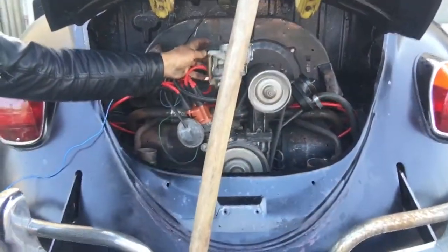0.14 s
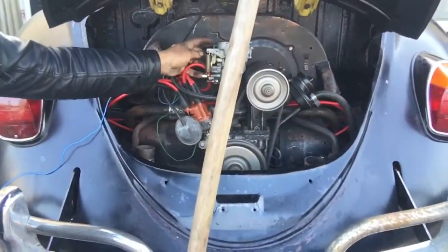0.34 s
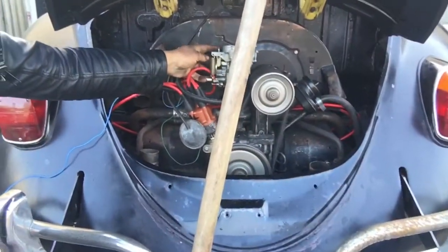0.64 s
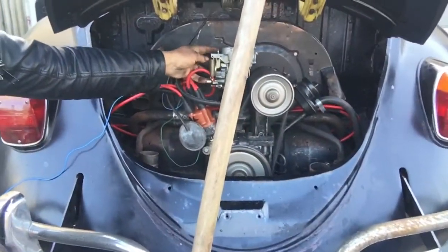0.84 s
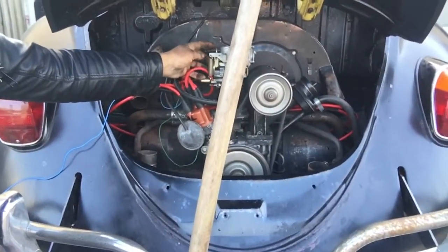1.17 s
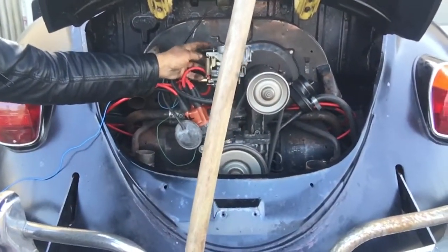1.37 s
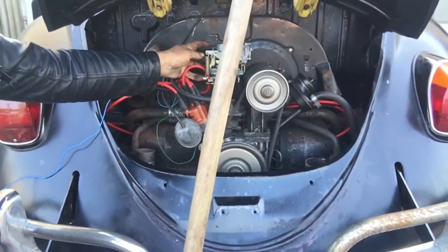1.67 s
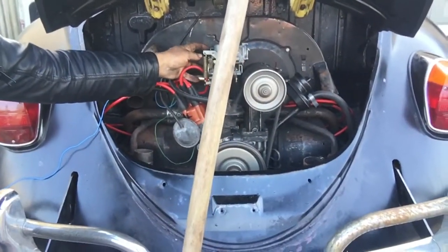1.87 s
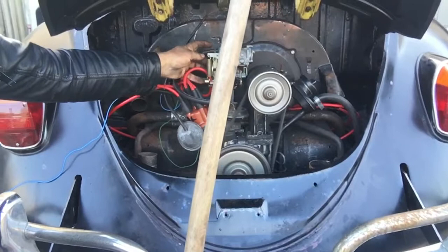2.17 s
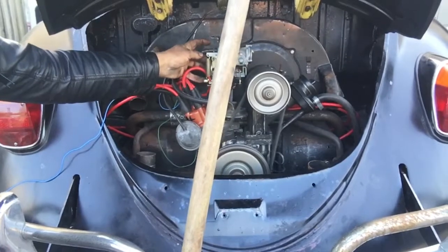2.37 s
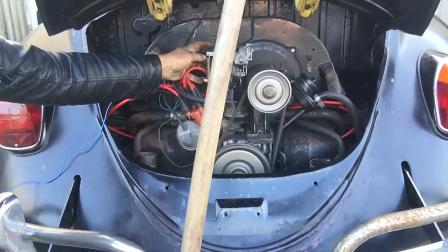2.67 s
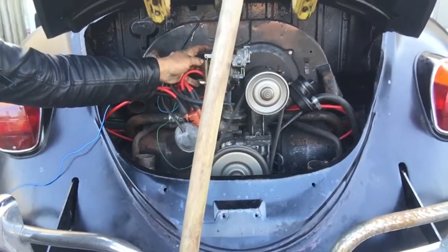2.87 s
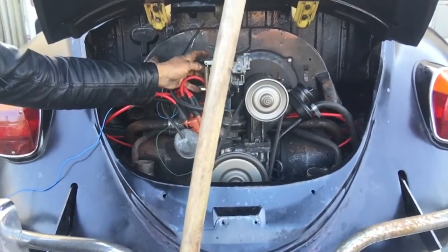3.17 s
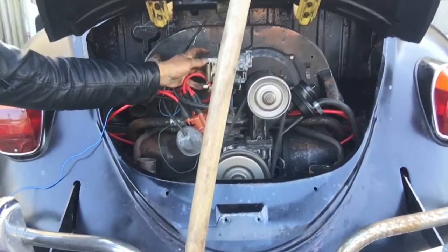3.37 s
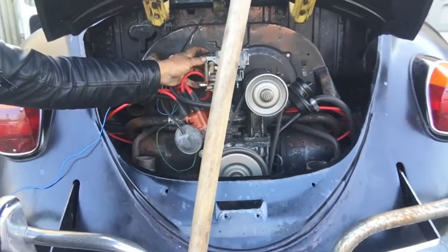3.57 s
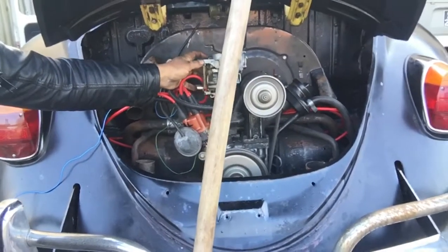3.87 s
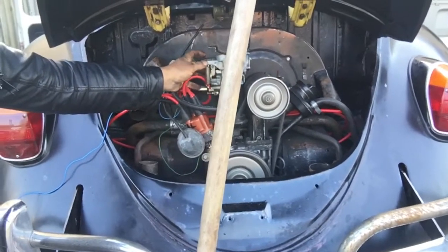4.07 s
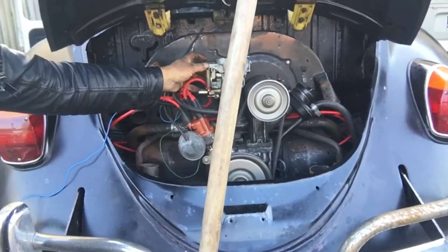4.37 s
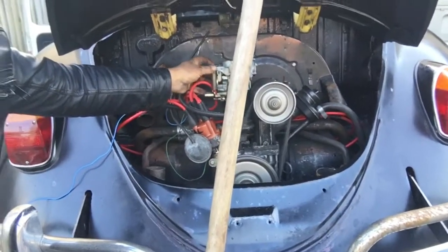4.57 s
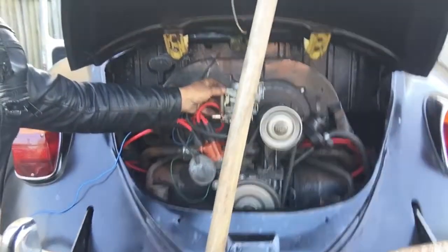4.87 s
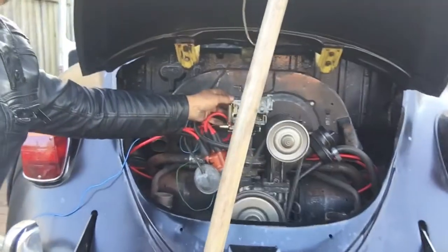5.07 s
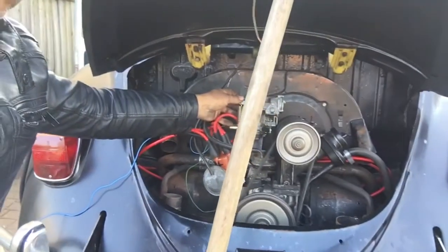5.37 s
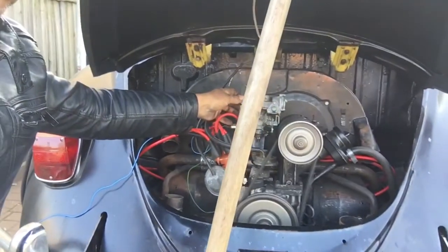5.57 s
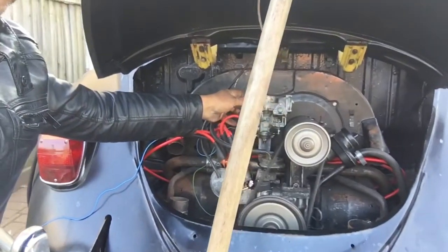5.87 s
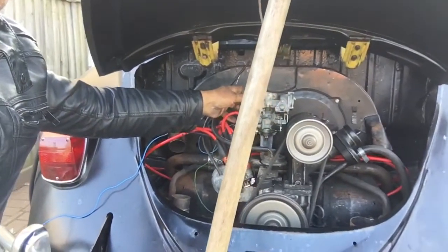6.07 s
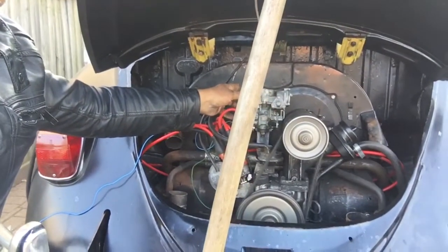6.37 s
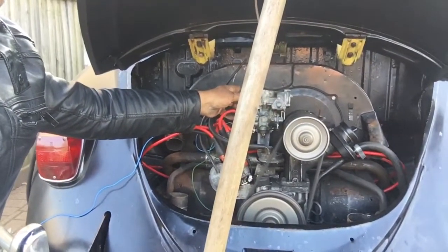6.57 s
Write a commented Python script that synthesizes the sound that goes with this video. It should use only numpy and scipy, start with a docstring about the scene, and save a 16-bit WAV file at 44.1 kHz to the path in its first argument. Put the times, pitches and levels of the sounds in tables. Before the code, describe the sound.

Close at an open engine bay outdoors, an old air-cooled four-cylinder engine is blipped by hand. A round exhaust boom rises and falls over metallic valve clatter, shaking tin and fan whine. Each opening brings raspy intake breath and bright, very short belt chirps. The longest rev stumbles with a sharp carburettor spit near three seconds; slower, lumpy running fills the gaps. Sound is dry, with tiny bay echoes.

```python
"""At an open engine bay, lid raised: an air-cooled flat-four is blipped six times by hand, pulling and coasting,
and sinks to a lumpy idle between blips. Sines locked to the firings make the exhaust boom and growl; filtered
impacts and noise make the valve-gear clatter, shaking tin and intake rasp; the fan whines as a wavering sine.
Fan-belt chirps are gliding sines, carburettor spits are noise cracks. No distance loss is applied: the bay's
short echoes sit 13 dB under the direct sound, and the microphone rounds the highest peaks."""
import sys
import numpy as np
from scipy import signal
from scipy.fft import rfft, irfft
from scipy.io import wavfile
from scipy.ndimage import uniform_filter1d

SR = 44100
rng = np.random.default_rng(int(sys.argv[2]) if len(sys.argv) > 2 else 0)


def generate_wav(sig):
    """Save sig (samples, or channels by samples) to the path in sys.argv[1] as 16-bit PCM at SR."""
    pcm = np.round(np.clip(np.atleast_2d(sig).T, -1, 1) * 32767).astype(np.int16)
    wavfile.write(sys.argv[1], SR, pcm)


N = 297234
TIME = np.arange(N) / SR

CHANGEOVER_S = 0.031  # the boom collapses about this long either side of a change of pulling or coasting
STUMBLE_S, STUMBLE_END_S = 2.87, 3.19  # the engine misfires at the top of the longest blip
STUMBLE_BOOM_DB, STUMBLE_RASP_DB = -6, -8.5

# In every spectrum below only the shape counts: colour() scales the filter to unit energy.

# turning points of the engine speed: time_s [s], firing_rate_hz [firings per second]
SPEED_POINTS = [(0, 65), (.17, 79.6), (.6, 59.7), (1.4, 33.01), (1.7, 30.91), (1.87, 45.54), (2.19, 76.9),
                (2.53, 57.7), (2.86, 87.93), (3.03, 87.9), (3.19, 93), (3.66, 69.5), (3.92, 89.9),
                (4.5, 62.17), (4.97, 44.78), (5.65, 43.62), (6.04, 74.83), (6.5, 54.2), (6.74, 63.1)]


def crankshaft():
    """The speed moves between turning points on a log scale; its running sum counts the firings."""
    time_s, rate_hz = np.transpose(SPEED_POINTS)
    hz = np.exp(np.interp(TIME, time_s, np.log(rate_hz)))
    return hz, np.cumsum(hz) / SR


# blips of the throttle: open_s [s], pull_s (the engine starts to pull) [s], shut_s [s],
# ease_s (time taken to ease it back) [s], rasp_db (intake rasp at full opening) [dB]
THROTTLE_BLIPS = [(-.35, -.1, .2, .14, -20.5), (1.55, 1.8, 2.2, .17, -22.5), (2.35, 2.53, 3.2, .04, -23),
                  (3.52, 3.67, 3.95, .08, -23.5), (5.52, 5.7, 6.06, .12, -23),
                  (6.36, 6.53, 6.95, .15, -24.5)]
OPEN_S = .3  # the hand opens the throttle this slowly
COAST_S, RELIGHT_S = 0.82, 0.31  # after a blip the engine coasts, then the idle firings return


def throttle(shut_db):
    """The hand moves the throttle between 0 and 1, and the level of the intake rasp follows it."""
    opening, rasp_db = 0, shut_db
    for opens, _, shuts, ease_s, full_db in THROTTLE_BLIPS:
        blip = ramp(opens, OPEN_S) * (1 - ramp(shuts - ease_s, ease_s))
        opening = opening + blip
        rasp_db = rasp_db + blip * (full_db - shut_db)
    return opening, rasp_db


def duty():
    """Shares of pulling, coasting and idling, and the nearness 0-1 of a changeover between them."""
    pulling = coasting = changeover = np.zeros(N)
    for _, pulls, shuts, *_ in THROTTLE_BLIPS:
        shut = ramp(shuts, CHANGEOVER_S)
        pulling = np.maximum(pulling, ramp(pulls, CHANGEOVER_S) - shut)
        coasting = np.maximum(coasting, shut - ramp(shuts + COAST_S, RELIGHT_S))
        for s, width_s in (pulls, 1.58 * CHANGEOVER_S), (shuts, CHANGEOVER_S):
            changeover = np.maximum(changeover, np.exp(-((TIME - s) / width_s) ** 2))
    shares = np.array([pulling, (1 - pulling) * coasting, (1 - pulling) * (1 - coasting)])
    return shares, changeover


# boom of the silencer against engine speed: firing_rate_hz [firings per second], level_db [dB]
SILENCER_BOOM = [(31, -36), (44, -18.5), (52, -16), (62, -12.5), (73, -10.5), (82, -15), (92, -15)]
# added to the boom, level of its octave, level of the lumps: pulling_db, coasting_db, idling_db [dB]
BOOM_DUTY_DB = [1, -0.1, -3]
OCTAVE_DUTY_DB = [-22.5, -29.5, -23.5]
LUMP_DUTY_DB = [-20.5, -27.5, -20.5]
# strength of the four cylinders in firing order: level_db [dB]
CYLINDER_STRENGTH_DB = [3.54, 2.88, 3.35, 2.5]
# ring of the silencer: frequency_hz [Hz], level_db [dB]
PIPE_SPECTRUM = [(30, -32.5), (45, -4), (66, 3.5), (90, -5.5), (115, -6.5), (150, -19), (220, -22.5),
                 (400, -42)]
MUFFLE_HZ, MUFFLE_DB_PER_OCTAVE = 68, -6  # above this firing rate the silencer damps the boom's octave
MISFIRE_DB = -16  # lumpy beat during a changeover or a stumble


def exhaust(firings, hz, stumble):
    """A round boom at the firing rate; unequal cylinders add a lumpy beat that rings the silencer."""
    shares, changeover = duty()
    tone_db = np.interp(hz, *np.transpose(SILENCER_BOOM)) + 0.93 * walk(24)
    tone = undb(tone_db) * (undb(BOOM_DUTY_DB) @ shares)
    muffle_db = MUFFLE_DB_PER_OCTAVE * np.maximum(np.log2(hz / MUFFLE_HZ), 0)
    octave = undb(muffle_db) * (undb(OCTAVE_DUTY_DB) @ shares)
    turn = 2 * np.pi * (firings + .01 * walk(40))
    boom = np.sqrt(2) * (tone * np.sin(turn) + octave * np.sin(2 * turn + 1))
    boom_gain = (1 - changeover) * undb(STUMBLE_BOOM_DB * stumble)

    beats = strokes(firings, CYLINDER_STRENGTH_DB, scatter_db=.55)
    # only what departs from the mean stroke makes lumps
    excess = beats - (beats > 0) * beats[beats > 0].mean()
    misfire = np.maximum(changeover, stumble)
    lump_gain = np.maximum(undb(LUMP_DUTY_DB) @ shares, undb(MISFIRE_DB) * misfire)
    return boom_gain * boom + lump_gain * unit(colour(excess / np.sqrt(hz), PIPE_SPECTRUM))


# overtones of the exhaust: multiple [times the firing rate], level_db [dB]
EXHAUST_OVERTONES = [(2.5, -10), (3, -16), (3.5, -12), (4, -6.5), (5, -16), (6, -13.5), (7, -12.5)]
# level against the machinery; added by full throttle; added while it misfires
GROWL_DB, GROWL_LOAD_DB, GROWL_STUMBLE_DB = -5.5, 2, 1.5


def growl(firings):
    """The pipes' overtones, half orders included, glide with the engine and flutter."""
    out = np.zeros(N)
    for multiple, db in EXHAUST_OVERTONES:
        level = undb(db + 2.5 * walk(25))
        turns = multiple * firings + rng.random() + .035 * walk(30)
        out += level * np.sin(2 * np.pi * turns)
    return out


# ring of the crankcase: frequency_hz [Hz], level_db [dB]
CASE_SPECTRUM = [(400, -5), (780, -11), (930, -2.5), (1030, 8), (1180, 2), (1400, 0), (1630, 3.5),
                 (1930, -3.5), (2200, -2.5), (2850, 2), (3300, -11), (4800, -20), (6600, -17.5),
                 (9500, -23), (16000, -35)]
# rattle of the tappets: frequency_hz [Hz], level_db [dB]
TAPPET_SPECTRUM = [(1000, 1.5), (2700, 10), (3800, 5.5), (4700, -1), (6300, 2.5), (8000, 1), (11500, -5),
                   (16000, -9)]
# level at 60 firings a second with the throttle shut; added by speed; added by full throttle
MACHINE_DB, MACHINE_DB_PER_OCTAVE, MACHINE_LOAD_DB = -28, 3.5, 4.5


def machinery(firings, hz):
    """Pistons and gears ring the crankcase over rushing air; the tappets rattle unevenly above them."""
    slaps = knocks(firings, spread_db=1.5, scatter_db=2.5, count=16) / np.sqrt(hz)
    clatter = undb(-7) * unit(slaps) + undb(-4.5) * puffs(slaps, decay_s=.007)
    rush = undb(-5.5 + 1.5 * walk(25)) * rng.standard_normal(N)
    taps = knocks(firings, spread_db=1.5, scatter_db=2.5, count=5)
    tappets = colour(puffs(taps, decay_s=.011), TAPPET_SPECTRUM)
    # the taps stand out more as the engine slows towards idle
    tappet_gain = undb(-7.5) * 55 / np.maximum(hz, 44)
    return colour(clatter + rush, CASE_SPECTRUM) + tappet_gain * tappets


def knocks(firings, spread_db, scatter_db, count):
    """Impacts that come back near the same angles of every four-firing cycle, each with its own strength."""
    angles = (np.arange(count) + rng.random(count)) / count
    sizes_db = spread_db * rng.standard_normal(count)
    play = .002 * walk(200)  # in cycles
    return sum(strokes(firings / 4 + angle + play, [size_db], scatter_db)
               for angle, size_db in zip(angles, sizes_db))


# belt slips: start_s [s], level_db [dB], pitch_hz (at the loudest point) [Hz]
BELT_SLIPS = [(0.0277, -4, 9400), (0.0847, -2, 9460), (0.123, -8.5, 9400), (0.1501, -3, 9360),
              (0.1889, -4, 9120), (1.7998, -8.5, 8400), (1.8956, -2, 8820), (1.9735, -2, 9220),
              (2.04, -2.5, 9430), (2.1015, -3.5, 9415), (2.155, -6, 9640), (2.5081, -0.5, 9020),
              (2.5724, 2, 9300), (2.6346, -4.5, 9150), (2.6928, -2.5, 9280), (2.7462, -4.5, 9380),
              (2.7959, -6, 9510), (2.8434, -5.5, 9520), (2.9571, 0.5, 9550), (3.026, -6.5, 9520),
              (3.0833, -5.5, 9560), (3.122, -4.5, 9470), (3.1685, -1.5, 9330), (3.6431, -3.5, 8590),
              (3.7, -2, 8490), (3.7546, -4, 8990), (3.8061, -8, 9450), (3.8302, -3.5, 9120),
              (3.8553, -2.5, 9360), (3.913, -6, 9360), (4.841, -15, 7980), (5.011, -17, 8070),
              (5.1905, -16.5, 8020), (5.2815, -16.5, 8300), (5.6458, -10.5, 8380), (5.7312, -5.5, 8795),
              (5.8067, -4.5, 9030), (5.876, -6, 9400), (5.9383, -4.5, 9490), (6.0512, -6.5, 8940),
              (6.4889, -5.5, 8570), (6.5616, -8, 8700), (6.6298, -1.5, 8900), (6.6972, -6.5, 8940)]
# under throttle the belt often slips again at the next firings, weaker each time
RESLIP_SHARE, RESLIP_DB, RESLIP_PITCH = 0.93, -7, 0.98
# at high revs a slip starts on a higher mode
SQUEAL_ABOVE_HZ, SQUEAL_LEAD_S, SQUEAL_DB, SQUEAL_PITCH = 85, 0.0054, -15, 1.18


def slips(speed, opening, count=3):
    """Every belt slip, its higher squeal at high revs, and weaker slips that may follow at the next firings."""
    for (s, db, hz), chances in zip(BELT_SLIPS, rng.random((len(BELT_SLIPS), count))):
        rate = np.interp(s, TIME, speed)
        yield s, db, hz
        if rate > SQUEAL_ABOVE_HZ:
            yield s - SQUEAL_LEAD_S, db + SQUEAL_DB, hz * SQUEAL_PITCH
        for chance in chances:
            s, db, hz = s + 1 / rate, db + RESLIP_DB, hz * RESLIP_PITCH
            if chance < RESLIP_SHARE * np.interp(s, TIME, opening):
                yield s, db, hz


def belt(speed, opening, build_s=.0022, glide=0.03, rise_s=0.0012, fall_s=0.0011, ring_db=-17, ring_s=0.0059):
    """Slips squeak for a few milliseconds and fall in pitch, further at high speed; the pulley rings on."""
    out = np.zeros(N)
    t = np.arange(-SR // 100, SR // 25) / SR  # 0 at the loudest point
    for s, db, hz in slips(speed, opening):
        waver, sway = (unit(uniform_filter1d(c, size=50)) for c in rng.standard_normal((2, len(t))))
        fall = glide * np.interp(s, TIME, speed) / 75
        pitch = hz * (1 + fall * (np.exp(-np.maximum(t, -.004) / 0.0033) - 1) + 0.023 * waver)
        slip = np.exp(1 - np.hypot(1, t / np.where(t < 0, rise_s, fall_s))) * (1 + 0.23 * sway)
        ring = undb(ring_db) * (t > 0) * np.exp(-np.abs(t) / ring_s) * sway
        squeak = undb(db) * (slip + ring) * np.sin(2 * np.pi * np.cumsum(pitch) / SR)
        first = np.round((s + build_s + t[0]) * SR)
        out += np.interp(np.arange(N), first + np.arange(len(t)), squeak, 0, 0)
    return out


# gulps through the intake: frequency_hz [Hz], level_db [dB]
INTAKE_SPECTRUM = [(250, -13.5), (380, -8), (580, -3), (820, -22), (1900, -9.5), (2130, 5.5), (2400, 5.5),
                   (2900, -3), (3300, -9), (5000, -22), (6800, -11.5), (11000, -20.5), (16000, -19)]
# air squeezing past the throttle plate: frequency_hz [Hz], level_db [dB]
THROAT_SPECTRUM = [(1850, -27.5), (2130, -1.5), (2280, -3), (2600, -10.5), (3200, -19.5)]
SHUT_RASP_DB, AIR_DB_PER_OCTAVE = -39.5, 2.5  # throttle shut, at 60 firings a second; added by speed
HISS_SHUT_DB, HISS_DB, HISS_OPENING = -40, -27, 0.46  # the hiss is at full strength from this opening on


def intake(firings, opening, rasp_db, air_db):
    """Each cylinder gulps air past the throttle; a nearly shut plate gives mostly a steady, whistling hiss."""
    gulps = puffs(strokes(firings + .5, [0], scatter_db=2), decay_s=.008)
    hiss_db = np.interp(opening, [0, HISS_OPENING], [HISS_SHUT_DB, HISS_DB]) + air_db
    hiss = colour(rng.standard_normal(N), THROAT_SPECTRUM)
    return undb(rasp_db) * colour(gulps, INTAKE_SPECTRUM) + undb(hiss_db) * hiss


# spits from the carburettor: start_s [s], level_db [dB]
CARBURETTOR_SPITS = [(0.159, -18), (2.053, -16), (2.851, -19), (2.9119, -6), (2.954, -26), (3.077, -17),
                     (3.118, -21), (3.171, -17.5), (3.868, -16.5), (5.767, -18.5), (5.84, -17)]
# crack of a spit: frequency_hz [Hz], level_db [dB]
SPIT_SPECTRUM = [(150, -14), (500, 11.5), (800, 1), (1100, 21), (1600, 14), (2300, 16), (3700, 8.5),
                 (4800, -2.5), (7000, 8), (11000, 2), (16000, -13)]


def spits(decay_s=0.011):
    """Sharp cracks of gas out of the carburettor throat: noise that starts at once and dies away."""
    swell = sum(undb(db) * (TIME >= s) * np.exp(-np.abs(TIME - s) / decay_s) for s, db in CARBURETTOR_SPITS)
    return colour(swell * rng.standard_normal(N), SPIT_SPECTRUM)


# shake of the shrouds and engine bay: frequency_hz [Hz], level_db [dB]
BODY_SPECTRUM = [(70, -42), (130, 2.5), (170, -3.5), (260, -2.5), (350, -1.5), (460, -10.5), (600, -11.5),
                 (800, -19), (1200, -45.5)]
TIN_DB, TIN_SLOPE = -7.5, .76  # the tinware's level, and its dB per dB of machinery


def tinware(firings, hz):
    """Every firing shakes the sheet-metal shrouds and the engine bay."""
    blows = strokes(firings, CYLINDER_STRENGTH_DB, scatter_db=1.5) / np.sqrt(hz)
    shaking = unit(blows) + undb(6.5) * puffs(blows, decay_s=0.019)
    return unit(colour(shaking, BODY_SPECTRUM))


FAN_DB = -19  # before the machinery level is applied


def fan(hz, blades_per_firing=23.85):
    """The belt-driven fan whines at its blade rate, wavering as the belt flaps, through the case's resonances."""
    blade_hz = blades_per_firing * hz * (1 + .016 * walk(200))
    blades = 2 * np.pi * np.cumsum(blade_hz) / SR
    flutter_db = 2.5 * walk(40)
    whine = undb(flutter_db) * np.sin(blades) * np.clip(hz / 50, 0, 1) ** 4
    return undb(FAN_DB) * colour(whine, CASE_SPECTRUM)


# belt rubbing on the pulley: frequency_hz [Hz], level_db [dB]
RUB_SPECTRUM = [(7500, -23.5), (8600, -8.5), (9200, 1), (9900, -12), (11100, -6), (12500, -19)]
RUB_DB = -11.5  # against the intake rasp, so it grows with the throttle


def rubbing(firings):
    """The belt also creeps a little on the pulley at every firing."""
    return colour(puffs(strokes(firings, [0], scatter_db=4), decay_s=.003), RUB_SPECTRUM)


def linkage(at_s=0.51, ring_hz=2300, level_db=-19, decay_s=0.0091):
    """The throttle linkage clinks once on a close pair of modes."""
    t = np.maximum(TIME - at_s, 0)
    upper = np.sin(2 * np.pi * ring_hz * t)
    lower = 1.1 * np.sin(2 * np.pi * 0.94 * ring_hz * t)
    return undb(level_db) * np.exp(-t / decay_s) * (upper + lower)


def bay(x, t60_s=0.042, wet_db=-13):
    """Dense short echoes from the engine bay and the raised lid, as decaying noise."""
    t = TIME[:SR // 4]
    echoes = rng.standard_normal(len(t)) * np.exp(-np.log(1000) * t / t60_s) * (t > .002)
    return x + undb(wet_db) * signal.fftconvolve(x, echoes / np.linalg.norm(echoes))[:N]


def strokes(firings, pattern_db, scatter_db):
    """One impulse at each whole count, sized by a repeating pattern and by chance."""
    at = np.flatnonzero(np.diff(np.floor(firings)) > 0)
    out = np.zeros(N)
    out[at] = undb(np.resize(pattern_db, len(at)) + scatter_db * rng.standard_normal(len(at)))
    return out


def puffs(impulses, decay_s):
    """A short burst of turbulence after each impulse, scaled to rms 1 overall."""
    swell = signal.lfilter([1], [1, -np.exp(-1 / (decay_s * SR))], impulses)
    return unit(swell * rng.standard_normal(N))


def colour(x, spectrum, size=8192):
    """Ring a causal, minimum-phase filter of unit energy that has the given (Hz, dB) shape."""
    hz, db = np.transpose(spectrum)
    bins = np.log(np.maximum(np.fft.rfftfreq(size, 1 / SR), 1))
    # the response falls away beyond both ends of the table
    outside = np.maximum(np.log(hz[0]) - bins, 0) + np.maximum(bins - np.log(hz[-1]), 0)
    shape_db = np.interp(bins, np.log(hz), db) - 20 * outside
    # folding the cepstrum forward in time makes the filter causal
    cepstrum = irfft(np.log(undb(shape_db)))
    cepstrum[1:size // 2] *= 2
    cepstrum[size // 2 + 1:] = 0
    ring = irfft(np.exp(rfft(cepstrum)))
    return signal.fftconvolve(x, ring / np.linalg.norm(ring))[:N]


def walk(rate):
    """Smooth chance of rms 1 that changes rate times a second."""
    return unit(np.interp(TIME * rate, np.arange(N), rng.standard_normal(N)))


def ramp(start_s, length_s):
    """A straight rise from 0 to 1."""
    return np.clip((TIME - start_s) / length_s, 0, 1)


def undb(db):
    """Decibels to gain."""
    return 10 ** (np.asarray(db) / 20)


def unit(x):
    """Scale to rms 1."""
    return x / np.sqrt(np.mean(x ** 2))


def scene():
    """One crankshaft drives the engine's layers; speed and throttle set their levels."""
    hz, firings = crankshaft()
    octaves = np.log2(hz / 60)
    air_db = AIR_DB_PER_OCTAVE * octaves
    opening, rasp_db = throttle(SHUT_RASP_DB + air_db)
    stumble = ramp(STUMBLE_S - CHANGEOVER_S, CHANGEOVER_S) - ramp(STUMBLE_END_S, CHANGEOVER_S)
    rasp_db = rasp_db + STUMBLE_RASP_DB * stumble * opening
    machine_db = MACHINE_DB + MACHINE_DB_PER_OCTAVE * octaves + MACHINE_LOAD_DB * opening ** 2
    growl_db = machine_db + GROWL_DB + GROWL_LOAD_DB * opening + GROWL_STUMBLE_DB * stumble

    pipes = exhaust(firings, hz, stumble) + undb(growl_db) * growl(firings)
    engine = undb(machine_db) * (machinery(firings, hz) + fan(hz))
    squeaks = belt(hz, opening) + undb(rasp_db + RUB_DB) * rubbing(firings)
    carburettor = intake(firings, opening, rasp_db, air_db) + spits() + linkage()
    shake = undb(TIN_SLOPE * machine_db + TIN_DB) * tinware(firings, hz)
    # the pipes and the tin reach the microphone without the bay's echoes
    return (pipes + shake + bay(engine + carburettor + squeaks))[None]


TOP_HZ = 15900


def record(dry):
    """The microphone rounds the highest peaks and a steep low-pass cuts the top."""
    rounded = dry / (1 + dry ** 8) ** (1 / 8)
    return signal.sosfilt(signal.ellip(10, .2, 80, TOP_HZ, fs=SR, output="sos"), rounded)


dry = scene()
out = record(dry)
generate_wav(out)
```